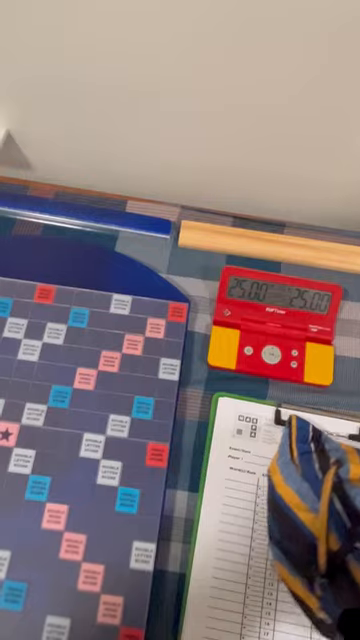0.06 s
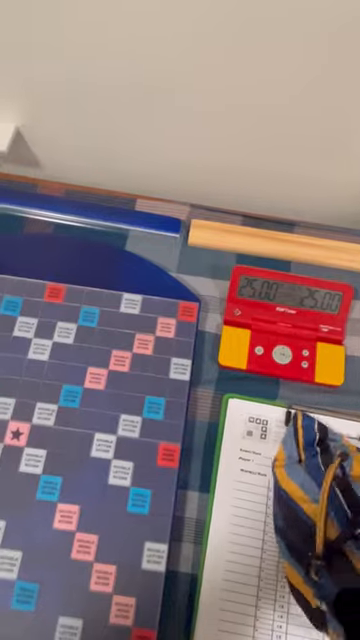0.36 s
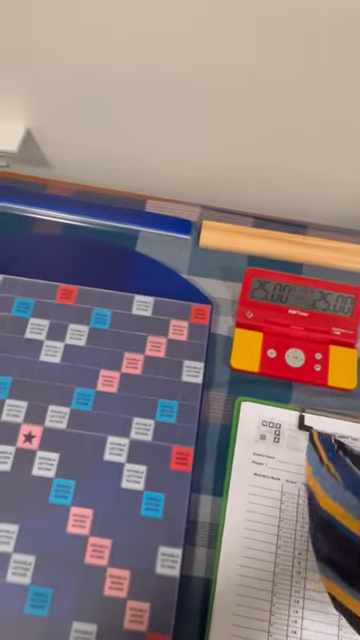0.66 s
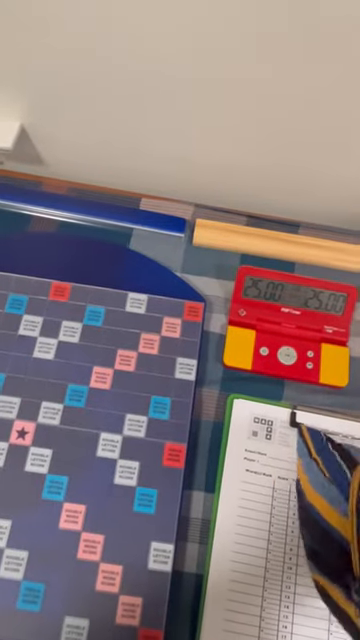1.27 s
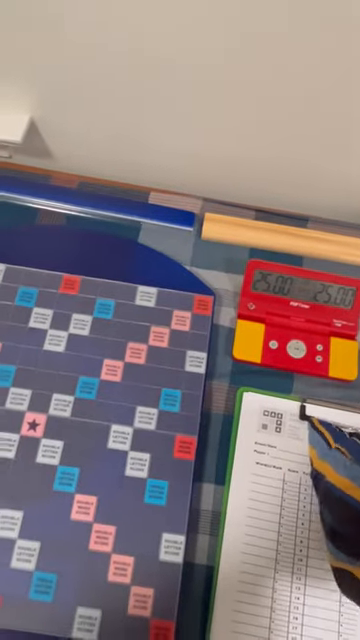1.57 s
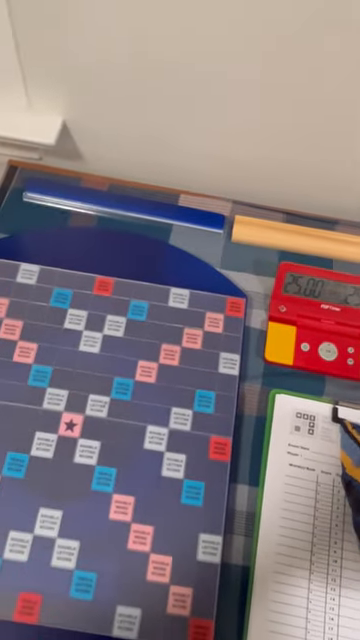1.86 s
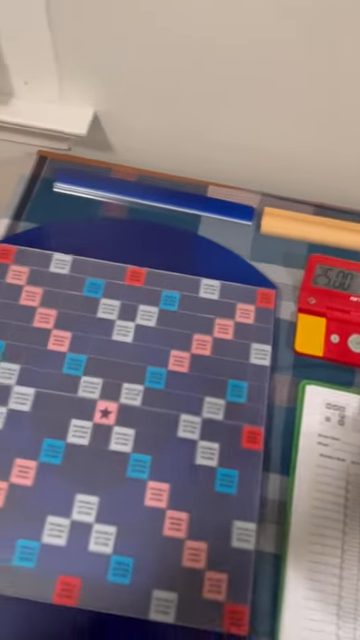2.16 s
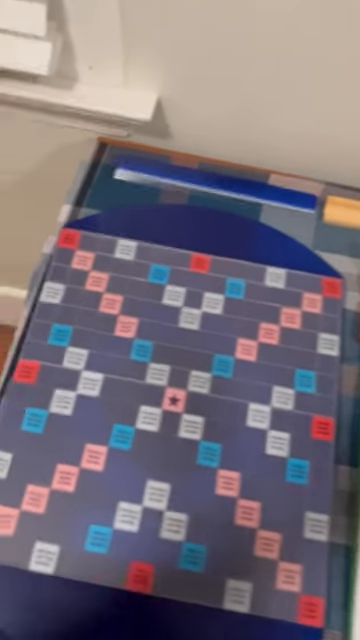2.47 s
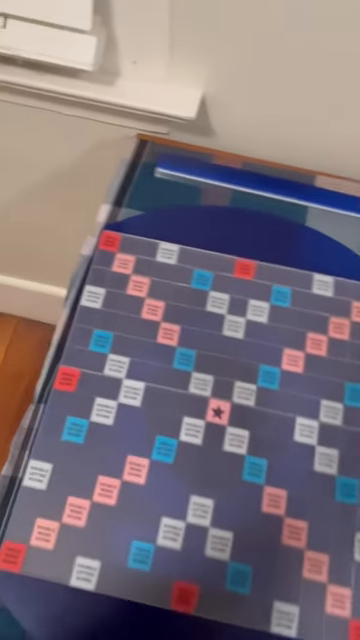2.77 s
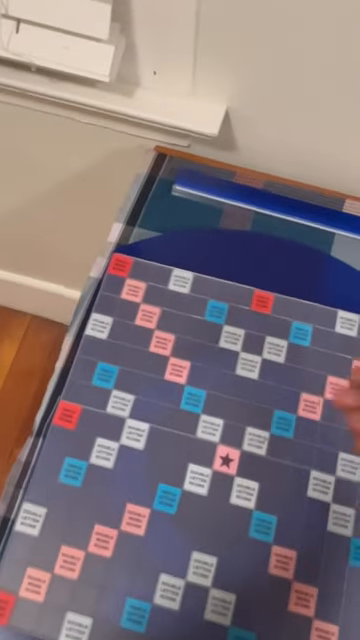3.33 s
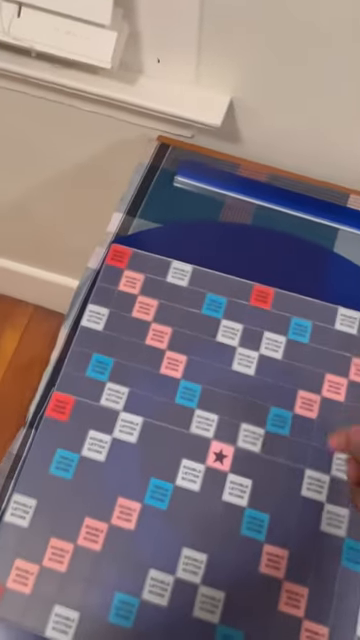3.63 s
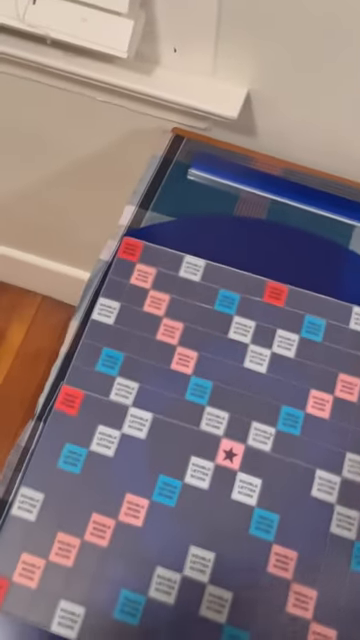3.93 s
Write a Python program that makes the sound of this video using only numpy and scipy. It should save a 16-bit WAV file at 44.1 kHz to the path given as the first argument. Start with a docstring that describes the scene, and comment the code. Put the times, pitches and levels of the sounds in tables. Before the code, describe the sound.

Plastic game tiles rattle densely as a cloth bag is shaken several times close to the microphone. The bag is then moved aside with faint rustles, clicks and soft bumps, over a low ventilation hum in a small room.

```python
"""Game tiles in a cloth bag

Plastic tiles shaken in a small quiet room, close to a stereo microphone and a little to its right.
Each toss is a surge of tiny collisions over the dull flop of the bag. The bag is moved aside with
cloth rustle, a few settling clicks and soft bumps, and at the very end the tiles stir again.
Ventilation and a mains hum go on underneath."""
import sys
import numpy as np
from scipy import signal
from scipy.fft import rfft, irfft, next_fast_len
from scipy.io import wavfile
from scipy.ndimage import uniform_filter1d

SR = 44100
rng = np.random.default_rng(int(sys.argv[2]) if len(sys.argv) > 2 else 0)


def digitize_waveform(pressure):
    """Quantize a signal to 16-bit integers and store it at the path in sys.argv[1].

    Rows of a 2-D input are taken as channels; values are limited to [-1, 1].
    """
    field = np.atleast_2d(pressure).T
    bounded = np.clip(field, -1, 1)
    quanta = np.round(bounded * 32767).astype(np.int16)
    wavfile.write(sys.argv[1], SR, quanta)


N = 176400

# tosses of the bag: peak_s, rise_s, fall_s, clatter_db, ticking_db, flop_db
TOSSES = [(0.005, 0.094, 0.066, -34, -39.5, -63), (0.185, 0.025, 0.049, -35, -36.5, -42.5),
          (0.461, 0.011, 0.038, -30, -35.5, -37), (0.54, 0.077, 0.077, -35.5, -40.5, -51.5),
          (0.624, 0.023, 0.067, -36, -42, -53.5), (0.68, 0.015, 0.025, -40, -52, -40),
          (0.817, 0.049, 0.044, -33, -38, -38.5), (0.926, 0.061, 0.044, -30, -35.5, -37.5),
          (1.058, 0.019, 0.06, -31.5, -37, -48.5), (1.21, 0.11, 0.082, -43, -44, -52),
          (1.36, 0.012, .035, -36.5, -38, -42.5), (1.424, 0.038, 0.029, -39.5, -43.5, -44.5),
          (1.528, 0.033, 0.024, -42.5, -53, -51), (2.11, .008, 0.071, -52, -74, -62.5),
          (4.0, 0.0061, .03, -34, -51.5, -39)]
# tiles churning between tosses: time_s, level_db
CHURN = [(0, -40.5), (.33, -38.5), (0.4, -43.5), (0.729, -47.5), (1.0, -44), (1.15, -45), (1.47, -47),
         (1.601, -62), (1.72, -66.5), (2.3, -105)]
# single tiles striking clear of the mass: start_s, level_db, pitch_hz, brightness_db
CLACKS = [(0.163, -27.5, 4300, -10), (0.455, -30.5, 7240, -4), (.463, -25, 4000, -5), (.490, -31, 7300, 1),
          (.605, -34, 3560, 6.5), (0.767, -32, 7100, 2), (0.784, -27.5, 4880, -2), (1.051, -20, 3870, -17),
          (1.083, -26, 6800, -15), (1.31, -31.5, 8100, 5.5), (1.32, -37.5, 5340, 4), (1.326, -33, 8200, 4),
          (1.408, -33, 6700, 1), (1.424, -29.5, 2290, -18), (1.452, -31.5, 3370, 1.5),
          (1.472, -35, 3120, -19), (1.664, -42.5, 6540, -13), (1.706, -45.5, 4750, -28),
          (2.1, -38, 4640, -15.5), (2.121, -45, 2160, 0), (2.201, -41, 5100, -4.5),
          (2.553, -39.5, 4900, -27), (2.567, -40.5, 4820, -22), (2.673, -44.5, 4800, -10.5),
          (2.76, -44.5, 4920, -22), (3.006, -57, 5020, -14.5), (3.302, -42, 4860, -7),
          (3.333, -47, 4940, -21),]
# partials of one tile: pitch_ratio
TILE_PARTIALS = [.93, 1, 1.07]
# the mass of tiles landing: start_s, level_db, pitch_hz
KNOCKS = [(.459, -24, 1350), (.919, -29, 611), (.922, -31, 760), (0.936, -38.5, 104.1),
          (1.051, -30.5, 1116), (1.052, -34, 398), (1.06, -37, 107), (1.067, -36, 281)]
# cloth sliding: start_s, end_s, level_db, sheen_relative_db
RUSTLES = [(1.6, 1.798, -56.5, -17), (1.798, 2.065, -58.5, -2.5), (2.098, 2.259, -57, -7.5),
           (2.531, 2.818, -61, -22), (3.292, 3.347, -65.5, -26), (3.931, 4.046, -58.5, -17.5)]
# handling bumps: peak_s, level_db
BUMPS = [(2.537, -61), (2.615, -51), (2.68, -47), (2.77, -49.5)]

# tone colour of each source: frequency_hz, relative_db
CLATTER_SPECTRUM = [(300, -15.5), (900, -9.5), (1400, -8.5), (1900, 0.5), (2600, 2.2), (4000, 1), (5200, 3),
                    (6500, -12), (9000, -35.5), (15000, -44.5)]
TICKING_SPECTRUM = [(3000, -29.5), (5500, 3), (7000, 9), (8500, 7), (10000, -5.5), (13500, 6.5),
                    (14400, -10), (16000, -34.5)]
FLOP_SPECTRUM = [(30, -41), (100, 8), (180, -5), (350, 3), (750, 4.5), (950, -10), (1500, -0.5),
                 (3000, -26)]
AIR_SPECTRUM = [(22, -35.5), (42, -12), (58, 6), (85, -7), (112, 3.5), (160, -1), (230, -11), (340, -6),
                (800, -16.5), (1150, -2), (1420, 3.5), (1700, -8.5), (2020, -24), (2550, -9.5),
                (3050, -21.5), (3700, -17), (4800, -32.5), (6100, -51), (15000, -62)]
CLOTH_SPECTRUM = [(300, 14.5), (1200, 12), (2500, 3), (5000, 3), (7500, 4), (10000, -14), (14000, -18.5),
                  (16000, -2)]
BUMP_SPECTRUM = [(40, -32.5), (115, 8), (200, -22), (320, 3.5), (2000, -82)]

# decay of the room: frequency_hz, t60_s
ROOM_DECAY = [(150, 0.12), (2000, 0.6), (9000, 0.091)]
# phase between the two microphone ports: frequency_hz, left_lead_rad
BAG_LEAD = [(0, 0.5), (400, -1.8), (700, -1.5), (1500, 1.56), (2100, -5), (3200, 4), (5600, 3.5),
            (14700, 15)]
AIR_LEAD = [(0, 0.14), (800, -1.8), (1400, -0.63), (2000, 0.54), (4500, -0.31)]
# likeness of the sound at the two ports: frequency_hz, coherence (0-1)
BAG_COHERENCE = [(100, .97), (450, .93), (800, .6), (1400, .8), (2800, .25), (4500, .55), (5600, .93)]
AIR_COHERENCE = [(100, 0.95), (650, 0.5), (1300, 0.71), (3000, 0.68)]
# the bag's place in the stereo image: frequency_hz, left_minus_right_db
BAG_BALANCE = [(80, -1.5), (300, -2), (1300, 1), (3300, -3.5), (5200, -4), (6200, 0)]
# resonances of the ports: centre_hz, half_width_hz, gain_db
PORT_PEAKS = [(5330, 110, 1.5), (11380, 155, 14.5), (13800, 210, 7)]

CONTACTS_PER_S, CONTACT_SPREAD_DB, CONTACT_T60_S, CONTACT_CRACK = 1300, 2.1, .02, .35
CHURN_TICK_DB, CHURN_FLOP_DB, FLOP_PATS_PER_S = -11.5, -7.5, 1800
AIR_DB, HUM_DB, HUM_HZ, HUM_WAVER_DEPTH, HUM_WAVER_HZ = -50, -57, 61, 0.55, 5.8
CRACK_T60_S, SNAP_GAIN, SNAP_T60_S, RING_GAIN, RING_T60_S = .022, .8, .006, .6, .036
REBOUND_MEAN_S, REBOUND_DB = 0.012, -6
KNOCK_RISE_S, KNOCK_T60_S = 0.0021, 0.062  # ring time at 1 kHz
RUSTLE_EDGE_S, CLOTH_GRAIN_DB, SHEEN_HZ, SHEEN_WIDTH_HZ = 0.017, 3.5, 12930, 1450
BUMP_RISE_S, BUMP_FALL_S = 0.011, 0.027
ROOM_DB, TOP_HZ = -8, 15800


def amp(db):
    """Decibels to gain."""
    return 10 ** (np.asarray(db) / 20)


def unit(x):
    """Scaled to rms 1."""
    return x / np.sqrt(np.mean(x ** 2) + 1e-20)


def fade(t, t60):
    """Exponential decay by 60 dB in t60 seconds."""
    return np.exp(-np.log(1000) * t / np.maximum(t60, 1e-4))


def along(points, hz):
    """A curve of (frequency_hz, value) points, read on a log frequency axis."""
    frequencies, values = np.transpose(points)
    return np.interp(np.log(hz + 1), np.log(frequencies + 1), values)


def filtered(x, response):
    """x through a frequency response."""
    size = next_fast_len(N + SR // 2)
    return irfft(rfft(x, size) * response(np.fft.rfftfreq(size, 1 / SR)), size)[..., :N]


def coloured(x, spectrum):
    """White x given a spectrum, at the same power."""
    return filtered(x, lambda hz: unit(amp(along(spectrum, hz))))


def swell(peak_s, rise_s, fall_s):
    """Exponential rise to a peak, then exponential fall."""
    t = np.arange(N) / SR - peak_s
    return np.exp(-np.abs(t) / np.where(t < 0, rise_s, fall_s))


def contacts(size=900):
    """A stream of tiny collisions, each a crack and two quickly damped partials of its own."""
    count = int(CONTACTS_PER_S * N / SR)
    draws = rng.random((count, 4))
    jitter, force, pitch_hz = draws[:, 0], draws[:, 1], TOP_HZ * draws[:, 2:, None]
    starts = ((np.arange(count) + 2 * jitter) * SR / CONTACTS_PER_S).astype(int)
    strength = amp(CONTACT_SPREAD_DB * np.minimum(-np.log(force), np.pi))
    t = np.arange(size) / SR
    clicks = np.sin(2 * np.pi * pitch_hz * t).sum(1) * fade(t, CONTACT_T60_S)
    clicks /= np.linalg.norm(clicks, axis=1, keepdims=True)
    clicks[:, 0] += CONTACT_CRACK * rng.standard_normal(count)
    positions = starts[:, None] + np.arange(size)
    return unit(np.bincount(positions.ravel(), (clicks * strength[:, None]).ravel(), N)[:N])


def shaking():
    """Each toss swells the clatter, the bright ticking and the flop of the bag above the churn."""
    churn_db = np.interp(np.arange(N) / SR, *np.transpose(CHURN))
    power = amp(churn_db + np.array([[0], [CHURN_TICK_DB], [CHURN_FLOP_DB]])) ** 2
    for peak_s, rise_s, fall_s, *levels_db in TOSSES:
        power += (amp(levels_db)[:, None] * swell(peak_s, rise_s, fall_s)) ** 2
    clatter, ticking, flop = np.sqrt(power)
    tiles = contacts()
    pats = unit(rng.standard_normal(N) * (rng.random(N) < FLOP_PATS_PER_S / SR))
    return (coloured(tiles * clatter, CLATTER_SPECTRUM)
            + coloured(tiles * ticking, TICKING_SPECTRUM)
            + coloured(pats * flop, FLOP_SPECTRUM))


def ventilation():
    """Room tone: steady air noise in stereo, with a wavering mains hum in the centre."""
    shared, scattered = amp(AIR_DB) * coloured(rng.standard_normal((2, N)), AIR_SPECTRUM)
    slow_noise = filtered(rng.standard_normal((2, N)), lambda hz: np.exp(-(hz / HUM_WAVER_HZ) ** 2))
    swing, drift = HUM_WAVER_DEPTH * unit(slow_noise)
    phase = 2 * np.pi * HUM_HZ * np.arange(N) / SR
    hum = amp(HUM_DB) * unit((1 + swing) * np.sin(phase) + drift * np.cos(phase))
    return ports(shared, scattered, AIR_LEAD, AIR_COHERENCE) + hum


def clacks(size=2000):
    """Single tiles strike and rebound once: a snapping crack and a few short partials each time."""
    body, edge, ring = np.zeros((3, N + SR))
    t = np.arange(size) / SR
    crack_decay = fade(t, CRACK_T60_S) + SNAP_GAIN * fade(t, SNAP_T60_S)
    for start_s, level_db, pitch_hz, brightness_db in CLACKS:
        rebound_s = REBOUND_MEAN_S * (.5 + rng.random())
        for delay_s, loss_db in [(0, 0), (rebound_s, REBOUND_DB)]:
            blow = amp(level_db + loss_db)
            start = round((start_s + delay_s) * SR)
            span = slice(start, start + size)
            crack = blow * crack_decay * rng.standard_normal(size) / 2
            partials = sum(np.sin(2 * np.pi * (ratio * pitch_hz * t + rng.random()))
                           for ratio in TILE_PARTIALS)
            body[span] += crack
            edge[span] += crack * amp(brightness_db)
            ring[span] += RING_GAIN * blow * fade(t, RING_T60_S) * partials
    return coloured(body[:N], CLATTER_SPECTRUM) + coloured(edge[:N], TICKING_SPECTRUM) + ring[:N]


def knocks():
    """The mass of tiles lands in the bag with hollow, pitched knocks; lower ones ring longer."""
    out = np.zeros(N)
    for start_s, level_db, pitch_hz in KNOCKS:
        t = np.maximum(np.arange(N) / SR - start_s, 0)
        t60 = KNOCK_T60_S * np.sqrt(1000 / pitch_hz)
        envelope = (1 - np.exp(-t / KNOCK_RISE_S)) * fade(t, t60)
        out += amp(level_db) * envelope * np.sin(2 * np.pi * (pitch_hz * t + rng.random()))
    return out


def cloth():
    """The bag slides with a fine, grainy hiss; on quick slides the fibres add a high sheen."""
    t = np.arange(N) / SR
    gate = lambda elapsed_s: (1 + np.tanh(elapsed_s / RUSTLE_EDGE_S / 2)) / 2
    rub_gain, sheen_gain = sum(amp([[db], [db + sheen_db]]) * gate(t - start_s) * gate(end_s - t)
                               for start_s, end_s, db, sheen_db in RUSTLES)
    snags = amp(CLOTH_GRAIN_DB * unit(uniform_filter1d(rng.standard_normal(N), size=100)))
    rub, fibres = unit(snags * rng.standard_normal((2, N)))
    sheen = filtered(fibres, lambda hz: np.exp(-((hz - SHEEN_HZ) / SHEEN_WIDTH_HZ) ** 2))
    return rub_gain * coloured(rub, CLOTH_SPECTRUM) + sheen_gain * sheen


def bumps():
    """Handling the bag makes soft, dull bumps: brief swells of low noise."""
    envelope = sum(amp(db) * swell(peak_s, BUMP_RISE_S, BUMP_FALL_S) for peak_s, db in BUMPS)
    return envelope * coloured(rng.standard_normal(N), BUMP_SPECTRUM)


def room(x, size=128):
    """The small room answers with a short diffuse tail, longest in the midrange."""
    hz, t, (source, noise) = signal.stft(np.array([x, rng.standard_normal(N)]), SR, nperseg=size)
    decay = fade(t[:2 * size], along(ROOM_DECAY, hz)[:, None]) ** 2
    decay /= decay.sum(1, keepdims=True)
    power = signal.fftconvolve(np.abs(source) ** 2, decay, axes=1)[:, :len(t)]
    tail = noise * np.sqrt(np.abs(power) / np.mean(np.abs(noise) ** 2))
    return signal.istft(tail, SR, nperseg=size)[1][:N]


def bag():
    """The bag from close by: direct sound well above the room's tail."""
    direct = shaking() + knocks() + clacks() + cloth() + bumps()
    return direct + amp(ROOM_DB) * room(direct)


def ports(shared, scattered, lead, coherence):
    """Two microphone ports hear a shared and a scattered part, with a phase lead between them."""
    angle = lambda hz: np.arccos(np.clip(along(coherence, hz), 0, 1)) / 2
    mid = filtered(shared, lambda hz: np.cos(angle(hz)))
    side = filtered(scattered, lambda hz: np.sin(angle(hz)))
    pair = np.array([mid + side, mid - side])
    lead_rad = lambda hz: np.interp(hz, *np.transpose(lead))
    return filtered(pair, lambda hz: np.exp(.5j * np.outer([1, -1], lead_rad(hz))))


def scene():
    """The bag a little to the right of the microphone, over the room tone."""
    pair = ports(bag(), bag(), BAG_LEAD, BAG_COHERENCE)
    placed = filtered(pair, lambda hz: amp(np.outer([.5, -.5], along(BAG_BALANCE, hz))))
    return placed + ventilation()


def record(dry):
    """The microphone ports resonate in the treble; nothing passes above the band limit."""
    peaks_db = lambda hz: sum(db / (1 + ((hz - centre) / width) ** 2) for centre, width, db in PORT_PEAKS)
    return filtered(dry, lambda hz: amp(peaks_db(hz)) * (hz < TOP_HZ))


dry = scene()
out = record(dry)
digitize_waveform(out)
```